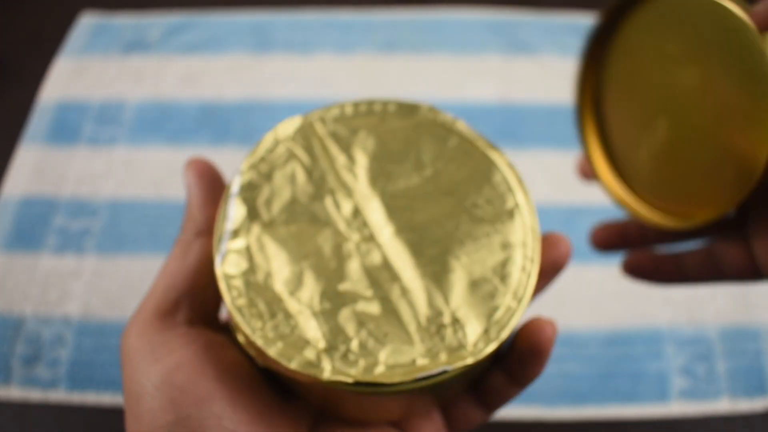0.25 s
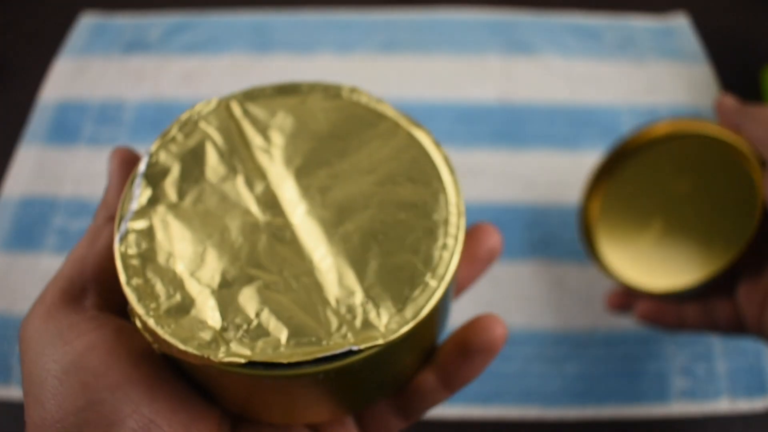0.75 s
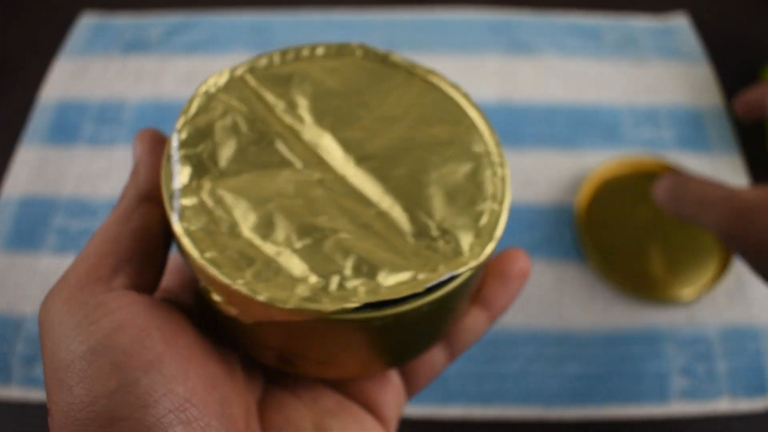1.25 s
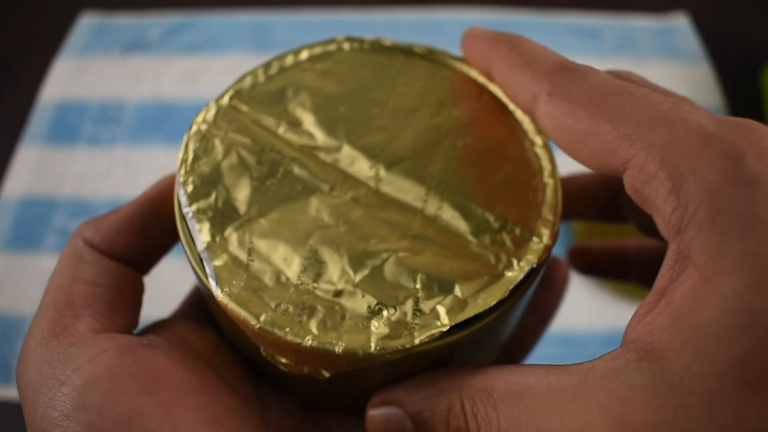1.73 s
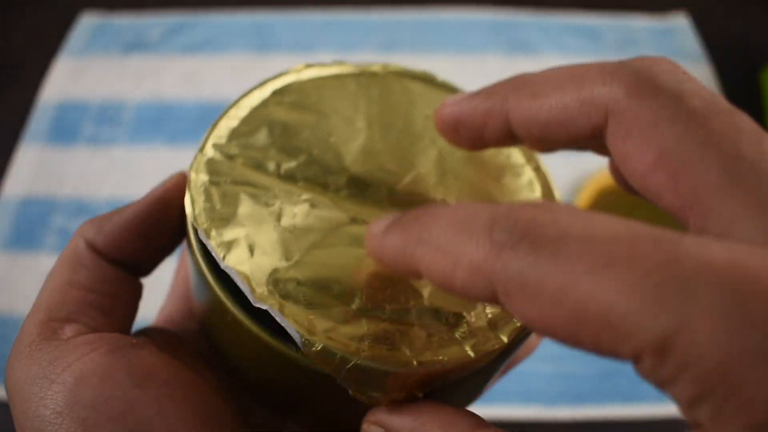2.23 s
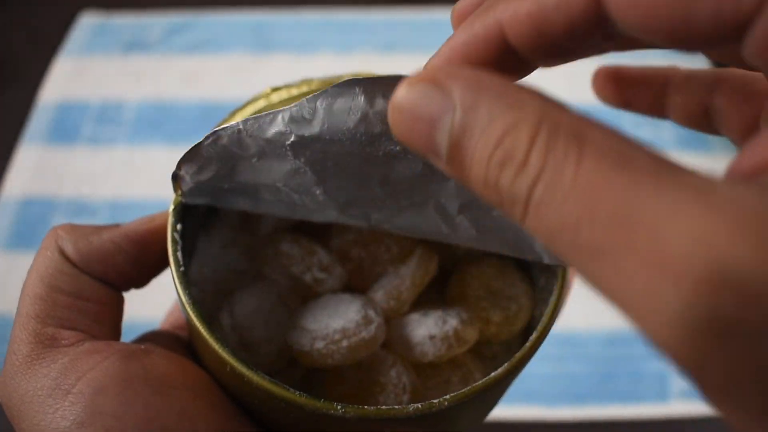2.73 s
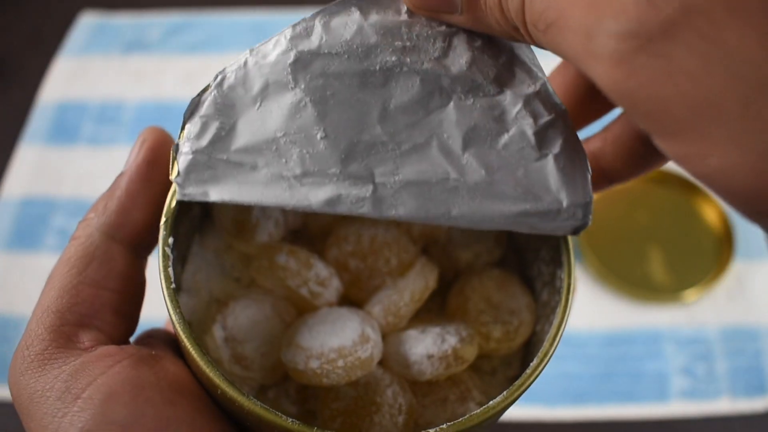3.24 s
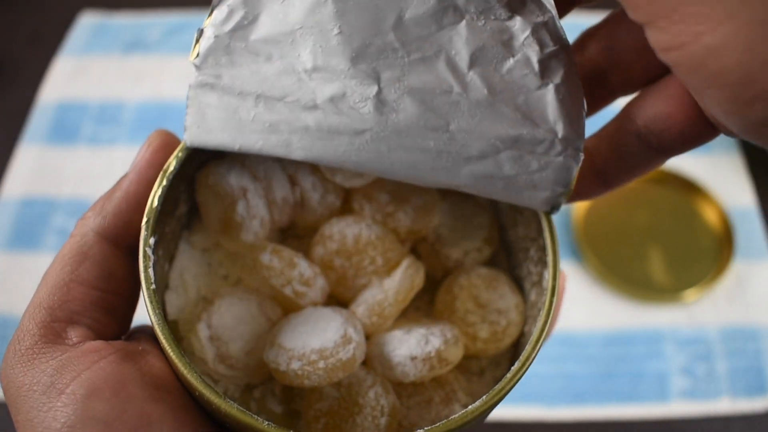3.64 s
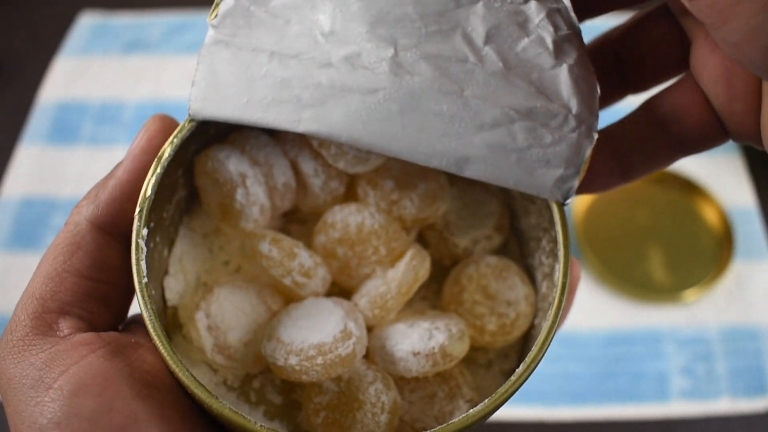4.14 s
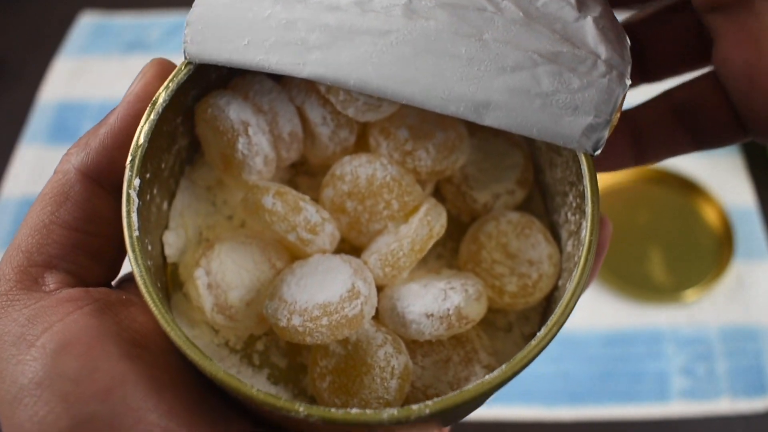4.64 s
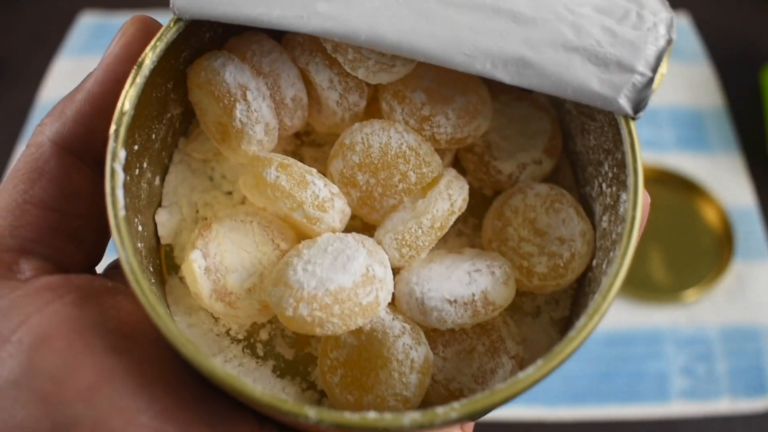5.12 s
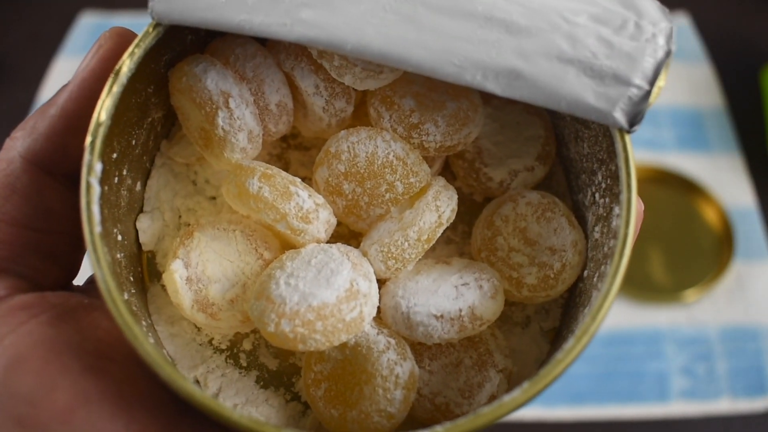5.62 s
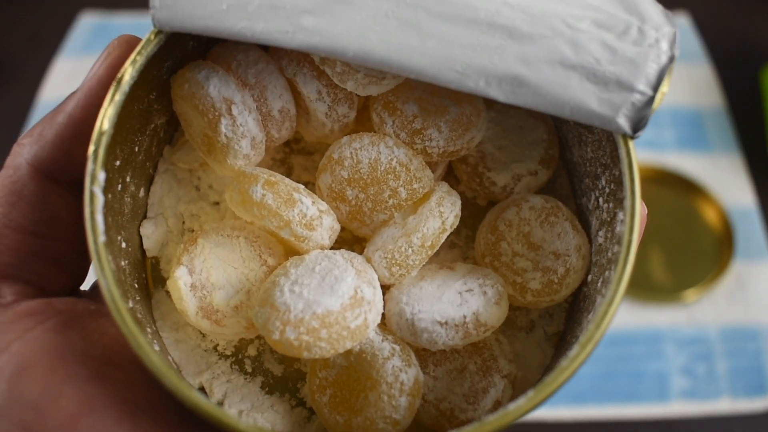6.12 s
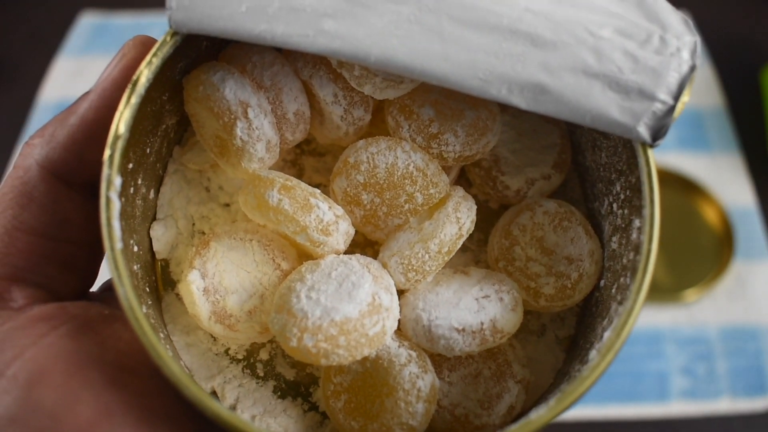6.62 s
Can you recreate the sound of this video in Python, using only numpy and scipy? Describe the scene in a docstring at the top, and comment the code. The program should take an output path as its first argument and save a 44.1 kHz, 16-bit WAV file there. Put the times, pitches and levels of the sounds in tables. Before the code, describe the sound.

A metal tin of sweets is opened close to the microphone in a quiet room. After the soft scrape of its lid being set on cloth come faint fingertip taps and rubbing on foil. The foil buckles with several crisp snaps, by far the loudest sounds, then gives a short rasping peel with a small metallic knock. A few light ticks of shifting sweets follow.

```python
"""A quiet, slightly live room, where a metal tin of sweets is opened close by.
The loose lid slides onto a cloth and fingers rub the foil seal: friction, a stream of tiny slips.
Bent back, the foil buckles with loud snaps, then peels along the rim. The tin takes a knock and a few
sweets click inside it. Each impact excites damped modes; the room and the tin ring on after it."""
import sys
import numpy as np
from scipy import signal
from scipy.fft import rfft, irfft
from scipy.io import wavfile

SR = 44100
rng = np.random.default_rng(int(sys.argv[2]) if len(sys.argv) > 2 else 0)


def materialize(psi):
    """Save the field psi as 16-bit PCM at rate SR to the path in sys.argv[1].

    A 1-D psi becomes a single channel; in a 2-D psi each row is a channel.
    """
    bounded = np.clip(np.atleast_2d(psi).T, -1, 1)
    quanta = np.round(bounded * 32767).astype(np.int16)
    wavfile.write(sys.argv[1], SR, quanta)


N = 302878

# Contacts. Each row: start in seconds, level in dB, brightness in dB per octave, extra fizz in dB,
# pitch factor.
FOIL_SNAPS = [(2.2122, -44, -5, 10, 0.73), (3.0895, -41.5, -5, 1.5, 0.96), (3.0925, -25.5, -8, -3, 0.9),
              (3.2258, -26.5, -10, 2.5, 0.78), (3.2438, -26.5, -11, -2, 1.09),
              (3.2935, -25, -1.5, -26, 1.42), (3.3319, -11, -7.5, 9, 1.034), (3.4545, -44, -3, -7, 0.64),
              (3.4785, -40.5, 2, -8, 1.32), (3.4971, -19.5, -2.5, 5, 1.06),
              (3.5305, -39.5, 3.5, -7.5, 1.23), (3.6622, -48, 2.5, -11, .91), (3.7198, -53, 4, -10.5, 1.3),
              (3.8755, -47, 0.5, -10, 1.24), (3.8835, -43.5, 1, -6.5, 1.4), (3.9122, -48, 0.5, -2.5, 1.13),
              (4.5896, -68, 1, 9.5, 0.84)]
TIN_KNOCKS = [(1.212, -58, 0, 5, 1.1), (2.2365, -47, -8, -4, 0.86), (4.6542, -64, -0.5, 16, .92),
              (4.7512, -44.5, -10, 17, 1), (4.7592, -39.5, 4.5, -7.5, .99)]   # the lid is set down; fingers bump the tin
SOFT_TAPS = [(0.1612, -57, -9, 10, 1.08), (1.232, -56, -2, 5, 0.85), (1.9072, -54, -8.5, 14, 0.96),
             (1.967, -52.5, -7.5, 5, 1.02), (2.3155, -48.5, -7.5, 12, 1.3)]   # the lid settles; fingertips land on the metal
SWEET_TICKS = [(5.4676, -61, 1.5, -16, 1.11), (5.778, -69, 4.5, -21, 1), (5.932, -41, 9, -38, 1.01),
               (6.5358, -41.5, -7.5, -2, 1), (6.6068, -56, 5, -32, 1.19), (6.6092, -51, 8, -24.5, 0.995),
               (6.6155, -47.5, 1.5, -25, .95), (6.6435, -57, 2.5, -19, 0.75)]
# Thump, body, edge and fizz of a contact. Each row: lower and upper limit in Hz.
CONTACT_BANDS = [(180, 700), (700, 2300), (2300, 5200), (5200, 16000)]
# Modes. Each row: frequency in Hz at pitch factor 1, relative strength in dB, 60 dB decay time in seconds.
FOIL_MODES = [(357.2, -2.5, 0.051), (490, -3, 0.0148), (804, -10, 0.038), (947, -2, 0.031),
              (1113, -1, .028), (1284, 0, 0.03), (1406, 0.5, 0.029), (1722, -1, 0.034), (1993, -2.5, 0.022),
              (2157, 1.5, 0.024), (2680, -2.5, 0.0071), (3150, -2, .014), (3995, -4.5, 0.005),
              (5180, 0, .013), (6850, -3.5, 0.012)]
TIN_MODES = [(366, -3.5, 0.13), (448, -7, 0.077), (663, 4.5, 0.047), (873, -10, 0.04), (1210, 5.5, 0.015),
             (1590, -24, 0.085), (2300, 5, 0.032), (3400, -2, 0.025), (3950, 4, 0.013), (4420, -29, .02),
             (5670, 9, 0.011), (7660, -18, .013)]
TAP_MODES = [(408, -4, 0.034), (803, -1.5, 0.068), (908, 10, 0.043), (1190, -2, 0.02), (1900, -2, .03),
             (2200, -10, 0.033)]
SWEET_MODES = [(530, -11, 0.036), (874, -7.5, 0.017), (1190, -2, 0.027), (1614, -3.5, 0.025),
               (2450, 4, 0.012), (2790, -2.5, 0.01), (3610, -0.5, 0.0092), (4240, -7, 0.011),
               (5390, -6, 0.012), (9200, 2.5, 0.0045)]
AFTER_RING = [(344, -1, 0.6), (424.5, 12, 0.96), (838, 3, 0.32), (927, -2.5, .5), (1060, -12.5, 1),
              (1430, -1.5, .45), (1380, -2, 0.48), (1620, -0.5, .45), (1770, 3.5, 0.54), (1874, 3, .45),
              (2181, 11, .5), (2930, 19.5, .25), (3235, 9, .42)]   # the whole tin ringing on
# Friction strokes. Each row: peak time in seconds, rise in seconds, relative level in dB of the rub
# below SPLIT_HZ, hiss above it in dB relative to the rub.
LID_SLIDE = [(1.0, 0.14, -59.5, 9.5), (1.016, 0.0052, -42, 5), (1.225, 0.063, -50.5, -5)]
FINGER_RUB = [(1.73, 0.32, -60.5, -1), (2.245, 0.026, -41.5, -12.5), (2.355, 0.05, -53.5, -3),
              (2.475, 0.073, -56.5, -0.5), (2.57, 0.072, -52, -4), (2.96, 0.017, -60.5, 1),
              (3.315, .012, -48.5, 1), (5.13, 0.21, -63, -12.5), (5.32, 0.37, -69, -11)]
RIM_PEEL = [(4.258, 0.019, -56.5, 1.5), (4.66, 0.019, -42.5, -10.5), (4.718, 0.082, -47, 7.5)]
# Friction resonances. Each row: centre in Hz, width in Hz, gain in dB.
LID_PEAKS = [(1120, 270, -6), (1444, 100, 8), (2060, 130, 0.5), (2320, 120, 0), (2600, 140, 1)]
FINGER_PEAKS = [(533, 109, -4), (692, 55, -1.5), (880, 280, -8.5), (1567, 160, -14.5), (2167, 160, -1.5),
                (8410, 1100, -7.5)]
PEEL_PEAKS = [(615, 55, 14.4), (1615, 19, 14), (2200, 63, 13), (3650, 74, 10.6), (4350, 71, 8.4),
              (5500, 240, 5.2), (7940, 250, 3.1)]
# Spectra. Each row: frequency in Hz, relative spectral density in dB.
LID_COLOUR = [(50, -38), (110, -10), (300, -2.5), (450, -6.5), (650, -4), (1000, 3.5), (3000, -10),
              (6000, -12), (10000, -15.5), (15500, -27)]
FINGER_COLOUR = [(60, -30), (120, -35.5), (230, 3.5), (350, -17), (900, 6), (2200, -3), (3500, -6.5),
                 (9000, -8.5), (15500, -21)]
PEEL_COLOUR = [(40, -38.5), (120, -12), (300, -24), (900, 5.5), (3000, 4.5), (6000, -1), (10000, -3.5),
               (15500, -13)]
ROOM_TONE = [(25, -28.5), (50, -28.5), (85, -26), (120, -10.5), (160, -14), (280, -8), (420, -4), (800, -7),
             (1400, -8.5), (2700, -11.5), (4250, -13.5), (8000, -18), (12900, -23), (16000, -29)]
# Reverberation. Each row: frequency in Hz, 60 dB decay time in seconds.
ROOM_T60 = [(200, 0.21), (530, 0.79), (1400, 0.5), (3700, 0.49), (9700, 0.54), (15000, 0.23)]

BODY_HZ, SHEEN_HZ = 1290, 8500   # a contact tilts above the first and thins out above the second
THUMP_FOLLOWS, MEDIUM_BLOW_DB = 0.66, -46.5   # thump gains 0.66 dB per dB beyond a medium blow
SPLIT_HZ, CUTOFF_HZ = 2500, 16200


def foil_snaps():
    """Buckling: bent foil jumps to a new shape and releases its elastic energy as a snap."""
    return contacts(FOIL_SNAPS, FOIL_MODES, crack_db=0.5, crack_t60=0.027, rise_s=0.00022,
                    click_db=3.5, thump_db=-11, room_db=-9.5)


def tin_knocks():
    """Impact excitation: a blow sets the tin's walls vibrating in their bending modes."""
    return contacts(TIN_KNOCKS, TIN_MODES, crack_db=-5, crack_t60=0.037, rise_s=0.00026,
                    click_db=-4, thump_db=2.5, room_db=-12)


def soft_taps():
    """Compliant impact: a soft touch builds its force slowly, so the metal rings with little crack."""
    return contacts(SOFT_TAPS, TAP_MODES, crack_db=-16, crack_t60=0.026, rise_s=0.00069,
                    click_db=6, thump_db=-6.5, room_db=-5.5)


def sweet_clicks():
    """Hard impact: sweets shift and touch so briefly that high modes are excited."""
    return contacts(SWEET_TICKS, SWEET_MODES, crack_db=-4, crack_t60=0.0067, rise_s=0.0001,
                    click_db=6, thump_db=-9, room_db=-26)


def contacts(table, modes, crack_db, crack_t60, rise_s, click_db, thump_db, room_db):
    """Impulse response: a short crack plus ringing modes. Returns the direct sound and the room's feed."""
    t = np.arange(SR // 4) / SR
    out = np.zeros((2, N + len(t)))
    centres_hz = np.sqrt(np.prod(CONTACT_BANDS, axis=1))
    octaves = np.maximum(np.log2(centres_hz / BODY_HZ), 0)
    for start_s, level_db, brightness, fizz_db, pitch in table:
        # a sharper contact lifts the treble; a harder one has relatively less thump
        low_db = thump_db - (1 - THUMP_FOLLOWS) * (level_db - MEDIUM_BLOW_DB)
        band_db = level_db + brightness * octaves + np.array([low_db, 0, 0, fizz_db])
        ring = energy_one(ringing(modes, t, pitch))
        crack = energy_one(rng.standard_normal(len(t)) * dying(t, crack_t60))
        direct = (ring + from_db(crack_db) * crack) * (1 - np.exp(-t / rise_s))
        # summed over all directions the crack has no notches: the room receives it as a plain click
        radiated = ring + from_db(click_db) * (t == 0)
        start = int(start_s * SR)
        out[0, start:start + len(t)] += balanced(direct, band_db)
        out[1, start:start + len(t)] += from_db(room_db) * balanced(radiated, band_db)
    return out[:, :N]


def ringing(modes, t, pitch=1):
    """Modal superposition: damped sines of alternating sign, their strengths varying from blow to blow."""
    hz, db, t60 = np.transpose(modes)[:, :, None]
    strength = from_db(db + rng.standard_normal(db.shape))
    sign = (-1) ** np.arange(len(modes))[:, None]
    return np.sum(sign * strength * np.sin(2 * np.pi * hz * pitch * t) * dying(t, t60), axis=0)


def balanced(blow, band_db):
    """Band weighting: set a blow's energy in each band, expressed as rms over 10 ms."""
    window = .01 * SR
    blow = passband(blow, SHEEN_HZ, "low", order=2)
    # neighbouring bands join with opposite signs, which keeps the attack compact
    bands = [(-1) ** k * energy_one(passband(blow, edges)) for k, edges in enumerate(CONTACT_BANDS)]
    return np.sqrt(window) * from_db(band_db) @ np.array(bands)


def friction(strokes, colour, peaks, slips_per_s, smooth_db, hold_s, release_s):
    """Stick-slip friction: tiny uneven slips over a smooth hiss drive the rubbed body's resonances."""
    slips = rng.standard_normal(N) * (rng.random(N) < slips_per_s / SR)
    smooth = from_db(smooth_db) * rng.standard_normal(N)
    drive = coloured(rms_one(slips) + smooth, colour)
    sound = drive + sum(from_db(db) * signal.lfilter(*signal.iirpeak(hz, hz / width, fs=SR), drive)
                        for hz, width, db in peaks)
    rub = hiss = 0
    for peak_s, rise_s, level_db, hiss_db in strokes:
        pressure = from_db(level_db) * swell(peak_s, rise_s, hold_s, release_s)
        rub = np.maximum(rub, pressure)
        hiss = np.maximum(hiss, from_db(hiss_db) * pressure)
    low = rms_one(passband(sound, SPLIT_HZ, "low"))
    high = rms_one(passband(sound, SPLIT_HZ, "high"))
    return rub * low + hiss * high


def crinkle(strokes, creases_per_s, level_db, uneven_db, low_hz, hold_s, release_s):
    """Small-scale buckling: creases flip at random, in bright ticks that follow each stroke's hiss."""
    effort = sum(from_db(db + hiss_db) * swell(peak_s, rise_s, hold_s, release_s)
                 for peak_s, rise_s, db, hiss_db in strokes)
    sizes = from_db(uneven_db * np.minimum(rng.exponential(1, N), 3)) * rng.choice([-1, 1], N)
    ticks = sizes * (rng.random(N) < creases_per_s / SR)
    return from_db(level_db) * effort * rms_one(passband(ticks, [low_hz, CUTOFF_HZ], order=2))


def swell(peak_s, rise_s, hold_s, release_s):
    """Exponential envelope: a stroke grows 20 dB in rise_s, holds, and falls 20 dB in release_s."""
    t = np.arange(N) / SR - peak_s
    decades_down = np.maximum(-t / rise_s, 0) + np.maximum((t - hold_s) / release_s, 0)
    return from_db(-20 * np.minimum(decades_down, 10))


def room(x, first_echo_s, build_s, ring_db):
    """Reverberation: a diffuse tail, each band with its own decay, joined by the tin's after-ring."""
    t = np.arange(SR) / SR
    edges = np.geomspace(100, 17000, 12)
    tail = 0
    for low, high in zip(edges, edges[1:]):
        noise = passband(rng.standard_normal(len(t)), (low, high), order=2)
        tail += noise * dying(t, at_hz(ROOM_T60, np.sqrt(low * high)))
    tail = energy_one(tail * np.clip((t - first_echo_s) / build_s, 0, 1))
    after_ring = from_db(ring_db) * energy_one(ringing(AFTER_RING, t))
    return signal.fftconvolve(x, tail + after_ring)[:N]


def room_tone(level_db):
    """Ambient noise: a faint, steady random signal, strongest in the low middle range."""
    return from_db(level_db) * rms_one(coloured(rng.standard_normal(N), ROOM_TONE))


def coloured(x, spectrum):
    """Spectral shaping of a steady signal."""
    return irfft(rfft(x) * from_db(at_hz(spectrum, np.fft.rfftfreq(N, 1 / SR))), N)


def passband(x, edges, kind="band", order=3):
    """Causal Butterworth filter."""
    return signal.sosfilt(signal.butter(order, edges, kind, fs=SR, output="sos"), x)


def dying(t, t60):
    """Exponential decay, 60 dB down after t60."""
    return np.exp(-np.log(1000) * t / t60)


def at_hz(points, hz):
    """Interpolation on a log-frequency axis."""
    f, value = np.transpose(points)
    return np.interp(np.log(np.maximum(hz, 1)), np.log(f), value)


def from_db(db):
    """Decibels to amplitude ratio."""
    return 10 ** (np.asarray(db) / 20)


def rms_one(x):
    """Normalisation to unit rms."""
    return x / np.sqrt(np.mean(x ** 2) + 1e-20)


def energy_one(x):
    """Normalisation to unit energy."""
    return x / np.sqrt(np.sum(x ** 2) + 1e-20)


def scene():
    """Superposition: impacts, friction strokes, their reverberation and the room tone add in one channel."""
    direct, to_room = foil_snaps() + tin_knocks() + soft_taps() + sweet_clicks()
    lid = friction(LID_SLIDE, LID_COLOUR, LID_PEAKS,
                   slips_per_s=4300, smooth_db=3, hold_s=0.024, release_s=0.14)
    finger = friction(FINGER_RUB, FINGER_COLOUR, FINGER_PEAKS,
                      slips_per_s=650, smooth_db=0, hold_s=0.0092, release_s=0.13)
    peel = friction(RIM_PEEL, PEEL_COLOUR, PEEL_PEAKS,
                    slips_per_s=1800, smooth_db=-5.5, hold_s=0.012, release_s=0.018)
    creases = crinkle(FINGER_RUB, creases_per_s=170, level_db=-10.5, uneven_db=5, low_hz=6460,
                      hold_s=0.015, release_s=0.056)
    strokes = lid + finger + peel + creases
    echo = room(to_room + from_db(-8.5) * strokes, first_echo_s=0.0019, build_s=0.0017, ring_db=-11.5)
    return (direct + from_db(-1.5) * strokes + echo + room_tone(level_db=-59))[None]


def record(dry, lopsided=0.014):
    """Asymmetric saturation: the loudest snap overloads unevenly, adding a low thud; the top is cut."""
    bent = dry + lopsided * dry ** 2
    rounded = bent / (1 + bent ** 6) ** (1 / 6)
    return signal.sosfilt(signal.ellip(10, .2, 80, CUTOFF_HZ, fs=SR, output="sos"), rounded)


dry = scene()
out = record(dry)
materialize(out)
```